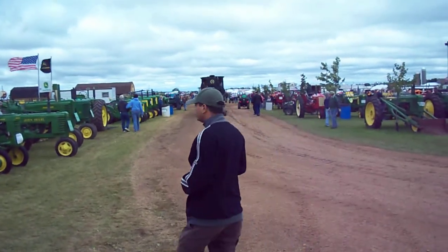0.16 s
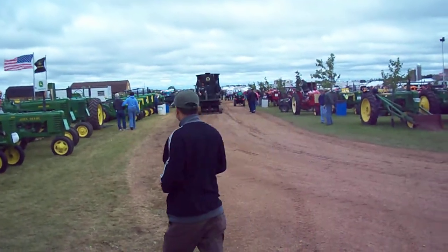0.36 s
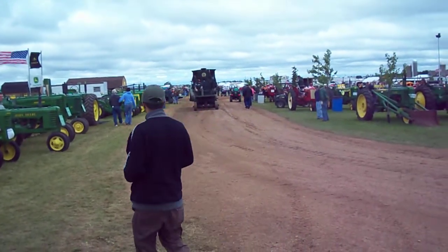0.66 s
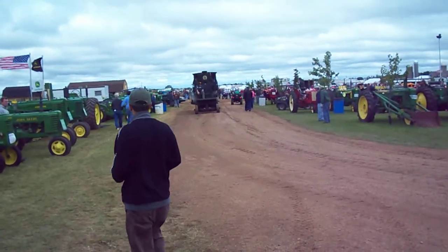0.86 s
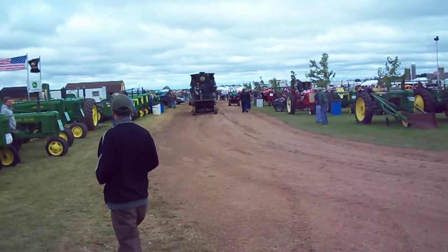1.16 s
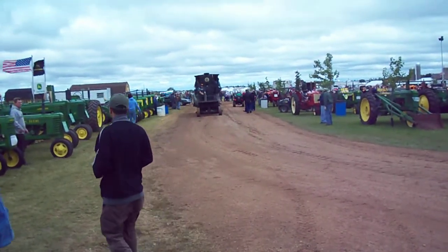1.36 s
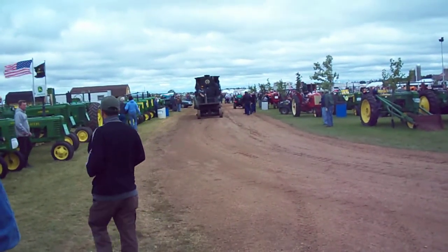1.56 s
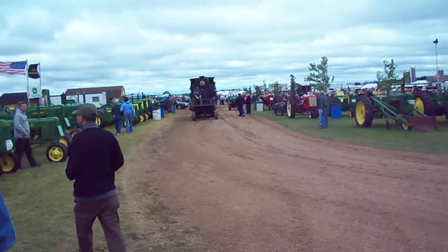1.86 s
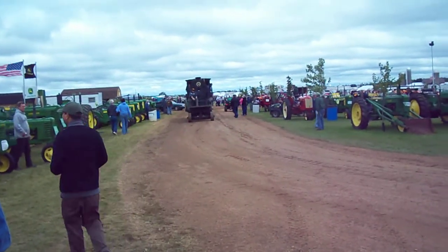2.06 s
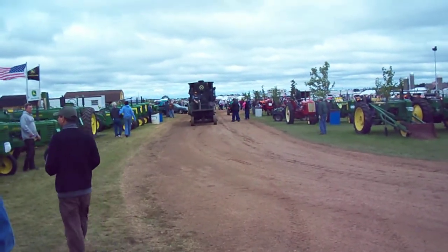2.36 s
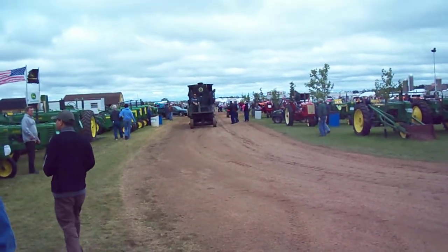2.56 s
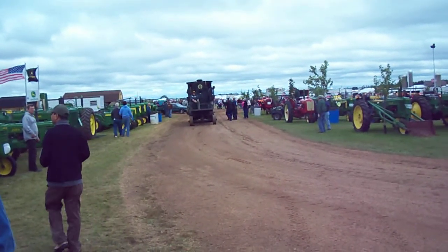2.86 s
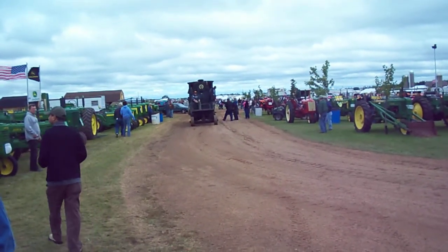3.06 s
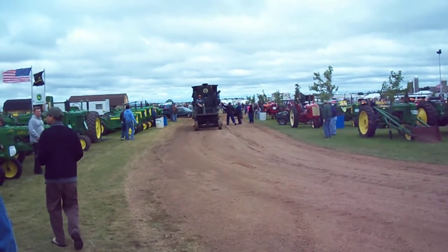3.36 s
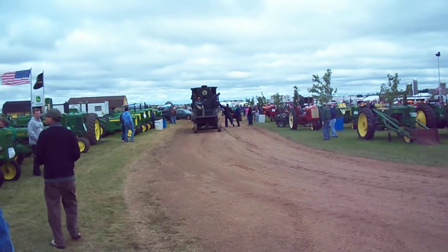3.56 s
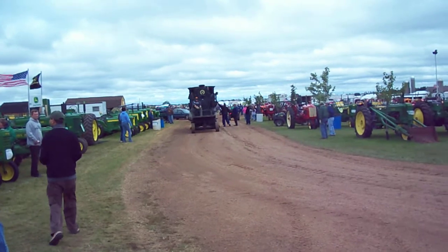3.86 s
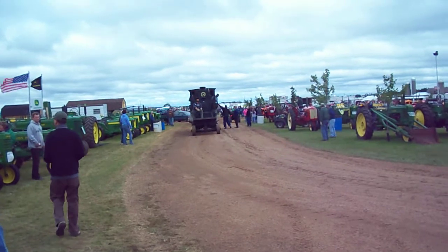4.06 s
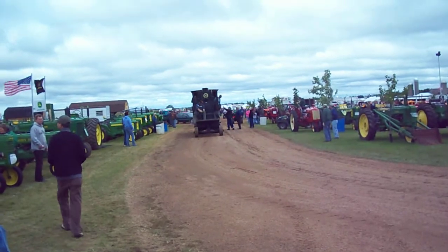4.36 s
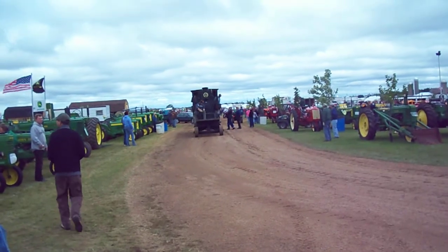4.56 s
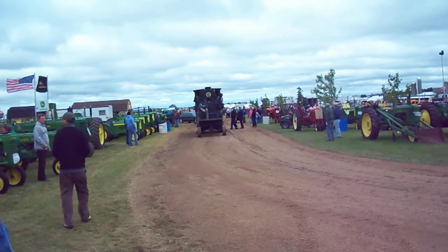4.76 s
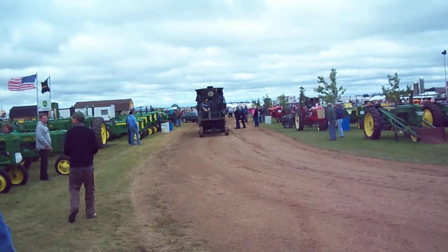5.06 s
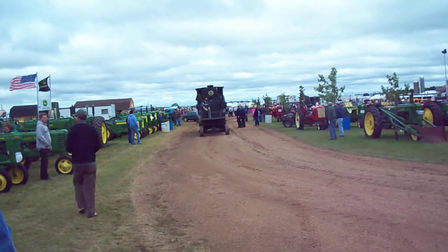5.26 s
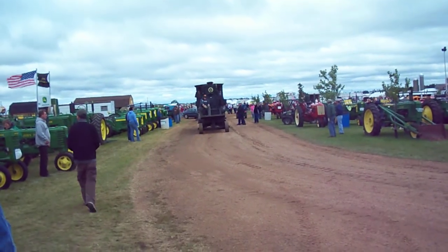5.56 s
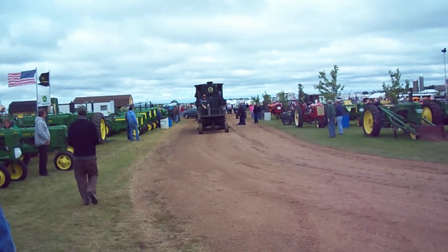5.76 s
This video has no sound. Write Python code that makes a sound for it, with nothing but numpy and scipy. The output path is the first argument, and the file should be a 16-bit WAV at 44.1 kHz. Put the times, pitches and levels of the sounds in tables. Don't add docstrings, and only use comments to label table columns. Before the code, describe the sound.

Heavy wind rumble, crackling pops and distortion cover a fast steam-engine chuff with leaking hiss and gear rattle, clearer towards the end.

```python
import sys
import numpy as np
from scipy import signal
from scipy.fft import rfft, irfft, next_fast_len
from scipy.io import wavfile
from scipy.ndimage import uniform_filter1d, map_coordinates

SR = 44100
rng = np.random.default_rng(int(sys.argv[2]) if len(sys.argv) > 2 else 0)


def decibels_to_gain(level_db):
    exponent = np.asarray(level_db, float) / 20
    return 10 ** exponent


def digitize_waveform(pressure):
    field = np.atleast_2d(pressure).T
    bounded = np.clip(field, -1, 1)
    quanta = np.round(bounded * 32767).astype(np.int16)
    wavfile.write(sys.argv[1], SR, quanta)


N = 261072

# beat_s, level_db, sizzle_db above the beat
CLEAR_BEATS = [(3.385, -39, -10), (3.875, -40, -10), (4.37, -40, -10), (4.455, -39, -10), (4.87, -38, -8),
               (.33, -43, -7), (.485, -39.5, -14), (.553, -41, -7), (.89, -42, -8), (2.09, -41.5, -8),
               (2.575, -45, -8), (1.936, -45, 1), (2.011, -43, -7), (2.257, -42, -4), (2.406, -39, -9.5),
               (2.745, -39, -5), (3.067, -37, -16), (3.227, -39, -2), (3.311, -34.5, -10),
               (3.471, -36.5, -10), (3.546, -41.5, -2), (3.629, -33.5, -9), (3.717, -32.5, -4.5),
               (3.791, -33, -17.5), (3.969, -37.5, -14), (4.049, -34, -8), (4.202, -36, -1.5),
               (4.288, -34.5, -13), (4.701, -37, -16), (4.805, -35.5, -6), (4.959, -35, -2.5),
               (5.038, -28, -7.5), (5.137, -38.5, -3.5), (5.218, -37.5, -23), (5.295, -32, -13),
               (5.377, -27.5, -10), (5.64, -31, -15), (5.732, -33, -6), (5.814, -27.5, -6.5),
               (5.903, -26.5, -13.5), (5.563, -38, -7), (5.47, -36, -6)]


def unit(x):
    return x / np.sqrt(np.mean(x ** 2) + 1e-20)


def curves(rows):
    s, *cols = np.transpose(rows)
    return [np.interp(np.arange(N) / SR, s, c) for c in cols]


def wobble(rate_hz):
    knots = rng.standard_normal(int(N * rate_hz / SR) + 4)
    return map_coordinates(knots, [np.arange(N) * rate_hz / SR])


def filtered(x, response):
    m = next_fast_len(len(x) + min(8192, 4 * len(x)))
    return irfft(rfft(x, m) * response(np.fft.rfftfreq(m, 1 / SR)), m)[:len(x)]


def colour(points):
    f, db = np.transpose(points)
    return lambda hz: decibels_to_gain(np.interp(np.log(hz + .1), np.log(f), db, -120, -120))


def rush(response, lumps=1.0):
    return unit(filtered(lumps * rng.standard_normal(N), response))


def even(x, seconds):
    return x / np.sqrt(np.abs(uniform_filter1d(x ** 2, size=round(seconds * SR))) + 1e-3)


def patchy(x, depth_db):
    z = signal.stft(x, nperseg=512)[2]
    field = uniform_filter1d(rng.standard_normal(z.shape), size=5, axis=0)
    field = uniform_filter1d(field, size=6, axis=1)
    return unit(signal.istft(z * decibels_to_gain(depth_db * unit(field)), nperseg=512)[1][:N])


def bump(s, half_s):
    return np.exp(-((np.arange(0, N + 64, 64) / SR - s) / half_s) ** 2)


def smooth(coarse):
    return np.interp(np.arange(N) / 64, np.arange(len(coarse)), coarse)


def eddies():
    # time_s, level_db about its mean
    wind_strength = [(0.0, -5.7), (0.1, 3.5), (0.35, 2.5), (0.65, -1.5), (0.85, 6.5), (1.1, 8), (1.4, -0.3),
                     (1.7, 4), (2.0, -0.1), (2.4, 5.5), (2.8, 0.2), (3.1, -2), (3.6, -3), (4.0, -2),
                     (4.4, -3), (4.9, -2), (5.4, -1), (5.92, -2)]
    # peak_s, half_length_s, level_db, eddy_size (0 large - 3 and above fine)
    gusts_and_lulls = [(0.701, 0.026, -10, 2.9), (0.727, 0.014, 33, 3.58), (1.072, 0.069, -10.5, 2.9),
                       (1.146, 0.015, 12.5, 1.3), (1.193, 0.019, 18.5, 1.6), (1.242, 0.036, -28, 2.5),
                       (1.288, 0.066, 12, 2.5), (1.351, 0.0097, -14, 2.6), (1.703, 0.11, -8, 1.8),
                       (1.903, 0.04, 11, 2.75), (1.99, 0.014, -17, 3.1), (2.071, 0.01, -14, 2.6),
                       (2.271, 0.034, -12, 1.76), (2.356, 0.021, 15, 3.2), (2.473, 0.029, -13.5, 1.1),
                       (2.682, 0.028, 7.5, 3.3), (2.914, 0.013, -9, 1.7), (2.987, 0.013, -13, 1.5),
                       (3.318, 0.021, 22, 3.8), (3.93, 0.039, -12.5, 1.17), (4.146, 0.017, 9.5, 3.15),
                       (4.325, 0.064, 7.5, 2.1), (4.367, 0.022, -10, 2.5), (4.461, 0.024, 11.5, 2.27),
                       (4.64, 0.028, 8, 2.3), (2.45, 0.0083, -13, 2.7), (2.877, .008, 9.5, 2.7),
                       (.77, .009, -12, 2.6), (1.847, .007, -12, 2.7), (4.355, .008, -8, 2.8),
                       (4.756, 0.033, -3.5, 2.3), (5.372, 0.048, 7, 2.8), (5.588, 0.03, -12.5, 3.0),
                       (5.747, 0.048, -11.5, 0.18), (5.803, 0.039, 6.5, 3.2),
                       (0.337, 0.037, 10, 0.74), (0.433, 0.044, 4, 0.083), (0.55, .05, 5.5, 1.08),
                    (0.712, 0.022, -10, .9), (0.797, 0.12, 3.5, 0.42), (1.274, 0.072, 5.5, 0.083),
                    (1.443, 0.05, 9.5, 0.093), (1.511, 0.017, 14, 0.96), (1.558, 0.026, -8, 1.014),
                    (1.933, 0.088, 6.5, 0.12), (2.197, 0.024, 10, 3.7), (2.304, 0.011, 12.5, 1),
                    (2.37, 0.044, 4.5, 0.094), (2.526, 0.023, 9, 1.5), (2.694, 0.037, 13.5, 0.84),
                    (2.904, 0.086, 9, 0.08), (3.057, 0.031, -3, .1), (3.84, 0.08, 7, .1),
                    (4.008, 0.018, 5, 0.53), (4.09, 0.037, -10, 0.65), (4.35, 0.019, 8.5, 0.089),
                    (4.617, 0.019, 9, 1.1), (4.692, 0.06, -6.5, .1), (4.86, 0.025, 6, 0.65),
                    (5.162, 0.14, -4, 0.092), (5.228, 0.022, 10.5, 1.04), (5.567, 0.035, 5.5, 1.4),
                    (5.92, 0.022, 18, 0.34), (0.232, 0.02, 3, 2), (0.989, 0.016, 5, 2)]
    # eddy_size, mean_level_db, gain_db per dB of wind
    layers = [
        (0, -13, 0.25),
        (1.001, -18.5, 0.43),
        (2, -25, 1.25),
        (3, -34.5, 1.5),
    ]
    size_reach = 1.076
    strength_db, = curves(wind_strength)
    gusts = [(db * bump(s, half_s), size) for s, half_s, db, size in gusts_and_lulls]
    levels_db = []
    for own_size, mean_db, grows in layers:
        lift_db = sum(g * np.exp(-((size - own_size) / size_reach) ** 2) for g, size in gusts)
        levels_db.append(mean_db + grows * strength_db + smooth(lift_db))
    return levels_db


def wind():
    # freq_hz, density_db per Hz
    heave_spectrum = [(1, -34.5), (4, -26.5), (8, -0.5), (16, -7), (28, -13.5), (60, -32)]
    buffet_spectrum = [(10, -54.5), (28, -2), (60, -0.5), (130, -9.5), (260, -28), (600, -72)]
    flutter_spectrum = [(50, -23), (130, -3), (250, -6.5), (500, -16), (900, -30.5), (2000, -77.5)]
    tearing_spectrum = [(200, -45), (500, 0.5), (900, -4.5), (1700, -24), (3500, -36.5), (8000, -55)]
    travel = .63
    heave_db, buffet_db, flutter_db, tearing_db = eddies()
    spit, flick = wobble(55), wobble(170)
    heave = rush(colour(heave_spectrum))
    buffet = rush(colour(buffet_spectrum), decibels_to_gain(1.6 * spit))
    flutter = rush(colour(flutter_spectrum), decibels_to_gain(2.6 * spit + 1.85 * flick))
    tearing = rush(colour(tearing_spectrum), decibels_to_gain(2.8 * spit + 3.5 * flick))
    heave = decibels_to_gain(heave_db - 2) * even(heave, seconds=0.57)
    buffet = decibels_to_gain(buffet_db) * even(buffet, seconds=.16)
    flutter = decibels_to_gain(flutter_db - 0.9) * even(flutter, seconds=0.08)
    tearing = decibels_to_gain(tearing_db - 6.0) * even(tearing, seconds=0.064)
    suction = filtered(decibels_to_gain(flutter_db + 5.5 + 1.6 * spit), lambda hz: 1j * hz / (5 + 1j * hz))
    swing = travel * np.tanh((heave + buffet - suction) / travel)
    return swing + flutter + tearing


def slaps():
    # start_s, length_s, level_db, corner_hz
    whips = [(0.209, 0.019, -18, 810), (.721, 0.012, -12, 1050), (.7245, .005, -12, 1600),
             (0.733, 0.0088, -18.5, 1100), (1.171, .008, -6, 1010), (1.18, 0.0087, -7, 910),
             (2.364, .008, -25, 670), (0.978, 0.015, -19, 1030), (1.159, 0.025, -18, 800),
             (1.175, 0.042, -4, 1090), (1.319, 0.005, -12, 1100), (1.326, .012, -20, 650),
             (.131, .008, -22, 900), (.828, .01, -21, 900), (.912, .01, -24, 700), (2.724, .01, -22, 900),
             (1.194, .016, -12, 1200), (1.147, .01, -15.5, 850), (4.63, 0.028, -27, 670),
             (1.922, 0.016, -20, 690), (2.033, .014, -22.5, 480), (2.193, 0.017, -21.5, 590),
             (2.582, 0.0074, -21, 800), (3.1, 0.0072, -24, 660), (2.686, 0.0123, -18, 630),
             (1.182, .012, -9, 1500), (1, .016, -18.5, 470), (0.32, 0.021, -25.5, 560),
             (0.25, 0.018, -21, 530), (4.447, 0.0089, -26, 550), (2.352, 0.03, -25.5, 560),
             (2.521, 0.019, -19.5, 873), (2.703, 0.0069, -16, 810), (3.3, .01, -34, 900),
             (4.66, 0.011, -30, 540)]
    # peak_s, peak_db, direction (+1 in, -1 out)
    spits = [(0.1345, -13, 1), (0.2118, -12.5, 1), (0.2596, -16.6, 1), (0.3106, -18.2, 1),
             (0.3559, -11.5, 1), (0.3876, -16.9, 1), (0.5704, -13.5, 1), (0.7253, -3.6, -1),
             (0.738, -12.5, 1), (0.782, -19.7, -1), (0.799, -16, 1), (0.831, -14, 1), (0.8496, -12, -1),
             (0.865, -13, 1), (0.8935, -15.6, -1), (0.9313, -15.1, -1), (0.953, -15.6, 1),
             (0.9873, -9.6, 1), (1.0791, -15, 1), (1.144, -6, 1), (1.2636, -21.4, -1), (1.2829, -15.6, 1),
             (1.3266, -14.6, 1), (1.3839, -17.5, -1), (1.5646, -17.6, -1), (1.6744, -19.5, 1),
             (1.7068, -19.1, 1), (1.8364, -15.5, 1), (1.8593, -16, -1), (1.8959, -11.4, -1),
             (1.9284, -16, -1), (2.0394, -19, -1), (2.1055, -16, -1), (2.1723, -13.5, -1),
             (2.188, -17.2, -1), (2.3076, -15.5, 1), (2.3357, -15, 1), (2.349, -9, 1), (2.3661, -8.8, 1),
             (2.4184, -14, 1), (2.5304, -13.0, 1), (2.6454, -15.3, 1), (2.6879, -17, 1), (2.702, -11, -1),
             (2.7279, -15, -1), (2.7722, -17.9, 1), (2.8797, -17, -1), (3.5131, -21, -1), (3.7174, -21, -1),
             (4.341, -19.7, 1), (4.4363, -20.1, -1), (4.4531, -20, 1), (4.5989, -20.2, -1),
             (4.6362, -19.2, 1), (4.6786, -21, -1), (5.0524, -20.5, 1), (5.3935, -19, 1), (5.4793, -19, 1),
             (5.6546, -20.1, 1), (5.8218, -16.5, 1)]
    # start_s, length_s, pressure
    pushes = [(.714, .008, -1.6), (.729, .012, .3), (.455, .007, -.35), (.536, .006, .35),
              (.634, .007, -.4), (.757, .022, .33), (4.595, .006, -.3), (4.622, .004, .5),
              (4.627, .003, -.3), (4.675, .007, -.25), (4.338, .02, .2), (5.477, .005, -.4),
              (.815, .022, -.35), (.888, .012, .4), (.938, .012, -.35), (1.165, .025, -.25),
              (1.19, .022, .55), (1.21, .023, 2.2), (1.228, .014, .3), (1.244, .02, -.3),
              (1.261, .017, -1.8), (1.319, .008, -.6), (1.338, .02, .15), (2.384, .01, .35),
              (2.89, .014, .3), (2.524, .012, -.6), (2.683, .014, -.5)]
    snap_half_s, snap_db, rebound, spray_db = .0004, 4, 0.28, -14.5
    out = np.zeros(N)
    air = rng.standard_normal(N) * decibels_to_gain(3.6 * wobble(390))
    sprays = [(s - .002, .012, db + spray_db, 600) for s, db, _ in spits]
    for s, length_s, db, corner_hz in whips + sprays:
        k, n = round(s * SR), round(length_s * SR)
        jet = filtered(air[k:k + n], lambda hz: 1j * hz / (200 + 1j * hz) / (1 + 1j * hz / corner_hz) ** 2.52)
        u = np.arange(n) / n
        out[k:k + n] += decibels_to_gain(db) * (unit(jet) - .8) * np.minimum(1, 7 * u) * (1 - u ** 1.11)
    t = np.abs(np.arange(-200, 200)) / SR / snap_half_s
    snap = (1 + rebound) * np.exp(-t ** 1.6) - rebound * np.exp(-(t / 5) ** 2)
    for s, db, direction in spits:
        out[round(s * SR) - len(t) // 2:][:len(t)] += np.sign(direction) * decibels_to_gain(db + snap_db) * snap
    for s, length_s, pressure in pushes:
        k, n = round(s * SR), round(length_s * SR)
        out[k:k + n] += pressure * signal.windows.tukey(n, .4)
    return out


def leak():
    # time_s, centre_hz, level_db
    hiss_path = [(0, 6133, -41), (.3, 6400, -51), (.55, 6210, -55.5), (.99, 6600, -53.5),
                 (1.43, 7060, -44.5), (1.61, 6030, -50.5), (1.9, 6600, -55), (2.08, 6096, -44.5),
                 (2.44, 6350, -49), (2.74, 6430, -43), (3.2, 6170, -47), (3.72, 6310, -43),
                 (3.95, 6800, -43), (4.65, 6700, -43.5), (5.2, 6250, -45.5), (5.47, 6990, -36),
                 (5.68, 6120, -48), (5.92, 6210, -35)]
    # peak_s, level_db
    spurts = [(.05, 5), (.35, 16.5), (.56, 19), (1.19, 19), (3.21, 7), (3.33, 7), (3.68, 8.5), (3.73, 2),
              (3.99, 5), (4.22, 6), (4.7, -15), (4.735, 3), (4.95, 7), (5.03, -6), (5.065, -1), (5.23, 8),
              (5.55, -14), (5.68, -11), (5.75, 0)]
    spurt_half_s, stroke_db, stroke_lag_s = 0.017, -0.5, .02
    centre_hz, db = curves(hiss_path)
    change_db = sum(spurt_db * bump(s, spurt_half_s) for s, spurt_db in spurts)
    for s, *_ in CLEAR_BEATS:
        stroke = 2 * bump(s + stroke_lag_s, spurt_half_s) - 1 / 2
        change_db = change_db + stroke_db * stroke * bump(s, 3 * spurt_half_s)
    db = db + smooth(change_db)
    narrow = lambda hz: 1 / (1 + (hz / 240) ** 2)
    band = 0
    for offset_hz, twin_db in ((-60, 1.0), (621.5, -5)):
        phase = 2 * np.pi * np.cumsum(centre_hz + offset_hz + 110 * wobble(11)) / SR
        fuzzy = rush(narrow) * np.cos(phase) + rush(narrow) * np.sin(phase)
        band = band + decibels_to_gain(twin_db + 2.3 * wobble(20)) * fuzzy
    return decibels_to_gain(db - 5.0 + 2.4 * wobble(90)) * patchy(band, depth_db=3.0)


def gear():
    # time_s, level_db
    clatter = [(0.0, -41.5), (0.74, -44.5), (1.02, -40.5), (2.14, -44), (2.34, -43.5), (3.17, -41.5),
               (3.74, -42.5), (4.17, -41.5), (4.48, -46), (4.75, -37.5), (4.95, -41), (5.24, -36.5),
               (5.67, -38.5), (5.84, -32), (5.92, -38.5)]
    # freq_hz, density_db per Hz
    rattle_spectrum = [(300, -30.5), (700, 7), (1300, 6), (2150, -1), (3200, -2.5), (4800, -6.5),
                       (6500, -7), (9600, -5.5)]
    level_db, = curves(clatter)
    rattle = rush(colour(rattle_spectrum), decibels_to_gain(2.8 * wobble(200)))
    return decibels_to_gain(level_db + 0.5 + 2.27 * wobble(14)) * patchy(rattle, depth_db=2.5)


def beats():
    first_s, beat_s, slowing_s = -.0511, .0781, .0000448
    k = np.arange(75)
    times_s = first_s + beat_s * k + slowing_s * k ** 2
    luck = rng.standard_normal((len(k), 2))
    level_db = -49 + 1.27 * times_s + 1.5 * luck[:, 0]
    sizzle_db = -52 + .6 * times_s + 2.0 * luck[:, 1] - level_db
    clear_s = np.transpose(CLEAR_BEATS)[0]
    soft = [tuple(row) for row in np.transpose([times_s, level_db, sizzle_db])
            if 0 < row[0] < N / SR and np.abs(clear_s - row[0]).min() > beat_s / 2]
    return soft + CLEAR_BEATS


def exhaust():
    # centre_hz, width_hz, level_db
    chimney = [(760, 400, 1), (1240, 260, 1), (2100, 170, 3), (3000, 220, 1), (3520, 200, 0),
               (4150, 260, -2), (5000, 900, -11)]
    # freq_hz, density_db per Hz
    sizzle_spectrum = [(3000, -36), (4600, -14), (6000, 0), (7400, -2), (9600, -5.5)]
    rise_s, fade_60db_s = 0.016, 0.23
    t = np.arange(SR // 5) / SR
    puff = (1 - np.exp(-(t / rise_s) ** 2)) * decibels_to_gain(-60 * t / fade_60db_s)
    roar, hiss = np.zeros(N + SR), np.zeros(N + SR)
    for s, db, sizzle_db in beats():
        k = round(max(s - .011, 0) * SR)
        roar[k:][:len(t)] += decibels_to_gain(db + 5.0) * puff
        hiss[k:][:len(t)] += decibels_to_gain(db + sizzle_db + 5.5) * puff

    def pipe(f):
        return sum((-1) ** k * decibels_to_gain(db) * 1j * f * w / (c * c - f * f + 1j * f * w)
                   for k, (c, w, db) in enumerate(chimney))

    ragged = decibels_to_gain(1.8 * wobble(230))
    ringing = patchy(rush(pipe, ragged), depth_db=0.5)
    sizzling = patchy(rush(colour(sizzle_spectrum), ragged), depth_db=5.5)
    return roar[:N] * ringing + hiss[:N] * sizzling


def scene():
    return (wind() + slaps() + leak() + gear() + exhaust())[None]


def low_pass(x):
    return signal.sosfilt(signal.butter(12, 15900, fs=SR, output="sos"), x)


def record(dry):
    # freq_hz, gain_db
    band_edge = [(7000, 0), (7500, -2), (8000, -8), (8400, -15), (8750, -25), (9000, -38), (9250, -66),
                 (9500, -100)]
    ceiling, full_scale = .69, .697
    grit_db, grit_top = -7, .008
    clipped = np.clip(dry[0], -ceiling, ceiling)
    slope = uniform_filter1d(np.abs(np.gradient(clipped)), size=40)
    grit_level = decibels_to_gain(grit_db) * grit_top * np.tanh(slope / grit_top)
    grit = grit_level * np.gradient(rng.standard_normal(N))
    narrow = filtered(clipped + grit, colour([(.01, 0)] + band_edge))
    return low_pass(np.clip(narrow, -full_scale, full_scale)[None])


dry = scene()
out = record(dry)
digitize_waveform(out)
```